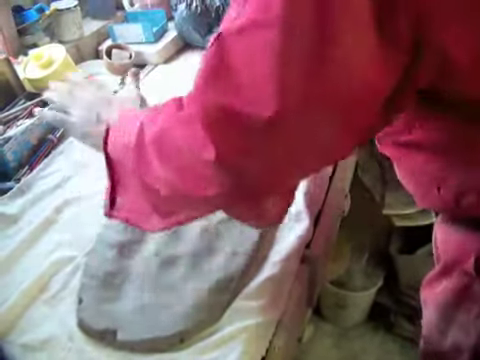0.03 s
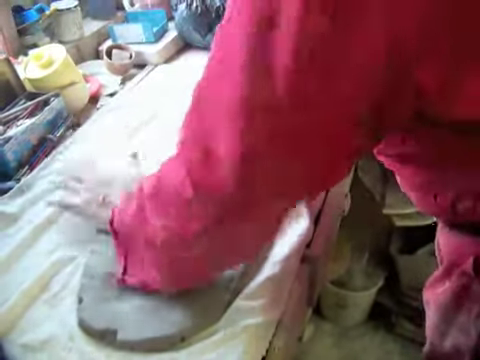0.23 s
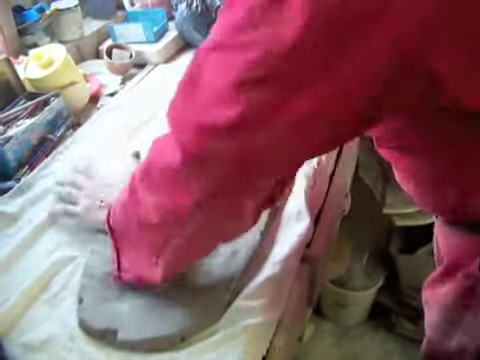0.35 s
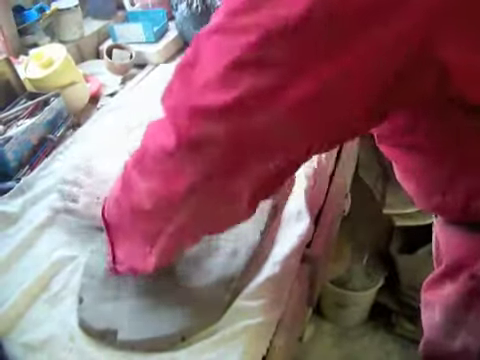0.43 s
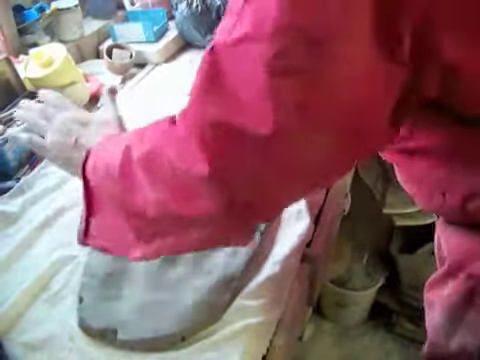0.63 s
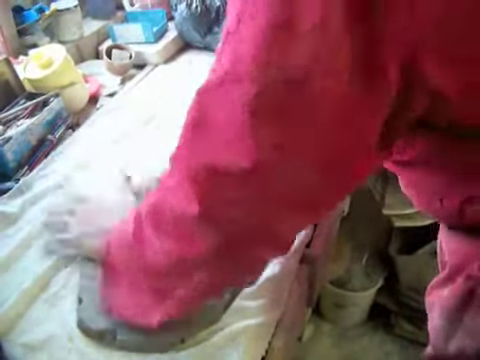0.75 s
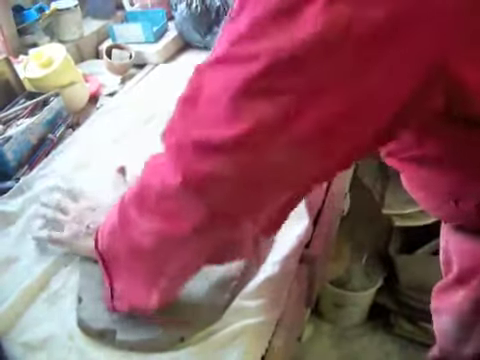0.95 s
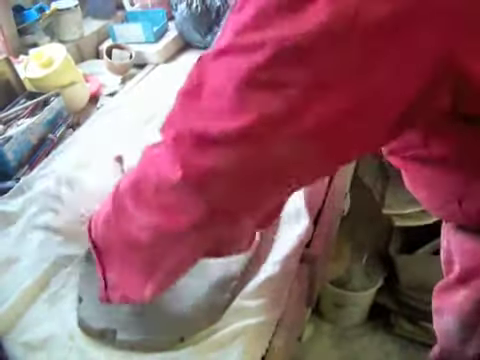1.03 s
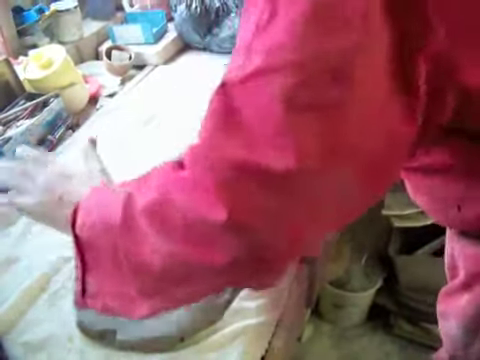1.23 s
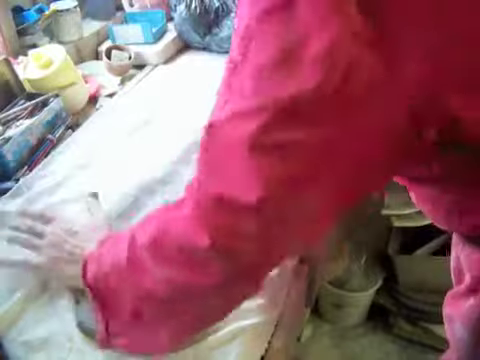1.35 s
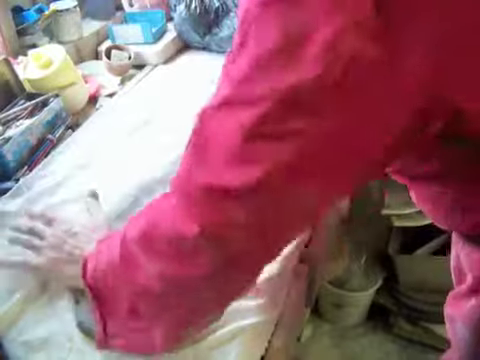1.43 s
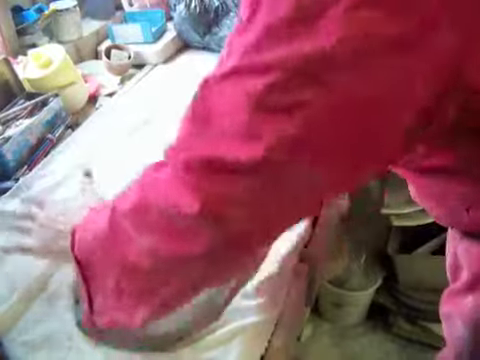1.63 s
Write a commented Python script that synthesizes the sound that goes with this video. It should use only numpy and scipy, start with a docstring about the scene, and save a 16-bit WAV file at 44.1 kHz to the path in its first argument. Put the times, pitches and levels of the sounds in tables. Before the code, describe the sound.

A hand slaps damp clay on a wooden bench at about 0.2, 0.8 and 1.35 seconds. Each close blow is a dull thud with a slight squelch; the second has the sharpest smack, the third a tiny air pop. Faint skin sliding and light pats come around 0.3 to 0.45 and 1.2 seconds. The small workshop adds a short reverberation and quiet room noise.

```python
"""Slapping damp clay

A hand slaps a slab of damp clay three times on a cloth-covered wooden bench in a small, quiet workshop. The
fingers land first with a crack; palm and heel follow with dull blows that excite the bench's modes, and the
clay squelches. Between slaps a sleeve swishes and the hand pats the slab lightly."""
import sys
import numpy as np
from scipy import signal
from scipy.fft import rfft, irfft
from scipy.io import wavfile

SR = 44100
rng = np.random.default_rng(int(sys.argv[2]) if len(sys.argv) > 2 else 0)


def bounce(signal):
    """Save signal as a 16-bit WAV file at the path given by the first command-line argument."""
    frames = np.transpose(np.atleast_2d(signal))
    limited = np.clip(frames, -1, 1)
    pcm = np.round(limited * 32767).astype(np.int16)
    wavfile.write(sys.argv[1], SR, pcm)


N = 74970


def amp(db):
    """Converts a level in decibels to an amplitude ratio."""
    return 10 ** (np.asarray(db) / 20)


def unit(x):
    """Normalises a signal to rms 1."""
    return x / np.sqrt(np.mean(x ** 2) + 1e-20)


def read(points, hz):
    """Interpolates a table on a logarithmic frequency axis."""
    f, value = np.transpose(points)
    return np.interp(np.log(hz + 1), np.log(f + 1), value)


def colour(x, spectrum):
    """Spectral shaping: weights each frequency of x, then normalises to rms 1."""
    gain = amp(read(spectrum, np.fft.rfftfreq(len(x), 1 / SR)))
    return unit(irfft(rfft(x) * gain, len(x)))


def add(mix, start, sound):
    """Superposition: adds a sound to the mix from a start time in seconds."""
    part = mix[max(round(start * SR), 0):][:len(sound)]
    part += sound[:len(part)]


def grains(per_s, spread_db):
    """Shot noise: tiny clicks of uneven size at random instants."""
    clicks = rng.standard_normal(N) * (rng.random(N) < per_s / SR)
    return clicks * amp(spread_db * np.minimum(rng.exponential(1, N), 3))


def background():
    """Ambient noise: steady room air and the slowly modulated rumble of the worked bench."""
    # spectrum of the room air (frequency [Hz], level [dB])
    air = [(20, -26), (35, 6.5), (52, 10.5), (80, -0.5), (125, -4), (190, -2), (260, -13.5), (330, -10),
           (500, -14.5), (1000, -18), (2000, -21), (3400, -21), (5000, -26.5), (7300, -33)]
    # spectrum of the bench's rumble (frequency [Hz], level [dB])
    rumble = [(20, -20.5), (55, 0), (115, 3.5), (210, -3), (300, -19.5), (550, -11), (1000, -27.5),
              (4000, -30.5)]
    # envelope of the rumble as the arm works (time [s], level [dB])
    rumble_level = [(0, -63.5), (.3, -55), (.43, -53.5), (.52, -60), (.75, -63), (.92, -54.5), (1.1, -55),
                    (1.27, -58), (1.5, -49.5), (1.7, -55)]
    swell = amp(np.interp(np.arange(N) / SR, *np.transpose(rumble_level)))
    steady = amp(-55.5) * colour(rng.standard_normal(N), air)
    return steady + swell * colour(rng.standard_normal(N), rumble)


def room_response():
    """Impulse response: early reflections from the cluttered bench, then a diffuse decaying tail."""
    # reverberation time of the workshop (frequency [Hz], t60 [s])
    reverberation = [(80, 0.34), (230, 0.49), (560, 0.27), (1470, 0.56), (3900, 1.01), (7500, .32)]
    # initial spectrum of the tail (frequency [Hz], level [dB])
    tone = [(60, -0.5), (250, -2.5), (600, -2.5), (1500, -2.5), (4000, -10.5), (7500, -4)]
    t = np.arange(SR) / SR
    reflections = rng.choice([-1., 1.], SR) * (rng.random(SR) < 4000 / SR)
    early = reflections * (t > 0.002) * np.exp(-t / 0.013)
    early = signal.sosfilt(signal.butter(1, 900, "high", fs=SR, output="sos"), early)
    hz, age, bands = signal.stft(rng.standard_normal(SR), SR, nperseg=256)
    bands = bands * amp(read(tone, hz)[:, None] - 60 * age / read(reverberation, hz)[:, None])
    tail = signal.istft(bands, SR, nperseg=256)[1][:SR] * np.minimum(t / 0.005, 1)
    return amp(-6) * early / np.linalg.norm(early) + amp(-11) * tail / np.linalg.norm(tail)


def room(tails=3, crossfades_per_s=14):
    """Smooth workshop reverberation: three crossfaded tails blend into an even, diffuse decay."""
    out, t = np.zeros(N), np.arange(N) / SR
    for k in range(tails):
        share = np.cos(np.pi * (crossfades_per_s * t + k / tails)) * np.sqrt(2 / tails)
        source = hand() + amp(-5) * pops()  # the pops sound drier, with less room ring
        out += signal.fftconvolve(source * share, room_response())[:N]
    return out


def sleeve(rise_s=0.002, bandwidth_hz=900):
    """Cloth friction: the sleeve swishes in strokes that start quickly and fade."""
    # sleeve swishes (time [s], length [s], level [dB], centre frequency [Hz])
    strokes = [(0.319, 0.15, -57, 1870), (0.374, 0.12, -65, 2800), (1.199, 0.11, -56, 2380)]
    # spectrum of the sleeve's rustle (frequency [Hz], level [dB])
    cloth = [(200, -26), (1000, -3), (1800, -6.5), (3600, -4), (5000, -8.5), (7500, -12)]
    out = np.zeros(N)
    for start, length, db, hz in strokes:
        age = np.maximum(np.arange(N) / SR - start, 0)
        envelope = (1 - np.exp(-age / rise_s)) * np.exp(-2 * age / length)
        slips = colour(grains(per_s=4700, spread_db=0.5), cloth)
        band = unit(signal.lfilter(*signal.iirpeak(hz, hz / bandwidth_hz, SR), slips))
        out += amp(db) * envelope * (band + amp(-4) * slips)
    return out


def pats(decay_s=0.0063):
    """Damped impact: the hand touches down lightly with a hollow puff of noise."""
    # light touches on the slab (time [s], level [dB])
    touches = [(.447, -47.5), (1.147, -56)]
    # spectrum of a pat (frequency [Hz], level [dB])
    puff = [(150, -22), (450, -1), (650, -7), (950, -4.5), (1400, -20.5), (4000, -27.5), (7500, -30)]
    out, t = np.zeros(N), np.arange(SR // 8) / SR
    for start, db in touches:
        add(out, start, amp(db) * np.exp(-t / decay_s) * colour(rng.standard_normal(len(t)), puff))
    return out


def pops(glide_per_s=-2.4):
    """Cavity resonance: trapped air escapes with a short ring that sinks as the pocket opens."""
    # air pockets under the hand (time [s], level [dB], starting frequency [Hz], t60 [s])
    pockets = [(.4472, -48, 680.6, 0.028), (1.2, -50, 2320, 0.037), (1.3555, -39, 3350, 0.024),
               (1.3562, -34.5, 2165, 0.018)]
    out, t = np.zeros(N), np.arange(SR // 8) / SR
    for start, db, hz, t60 in pockets:
        cycles = np.cumsum(hz * np.exp(glide_per_s * t)) / SR
        add(out, start, amp(db - 60 * t / t60) * np.sin(2 * np.pi * cycles))
    return out


def press():
    """Damped oscillation: the bench gives under the arm with a low push while the damp clay crackles."""
    # the arm's weight sinking into the slab (time [s], push level [dB], squelch level [dB])
    loads = [(0.2329, -26.5, -40), (0.796, -24.5, -41), (1.3448, -29.5, -41.5)]
    # spectrum of squelching clay (frequency [Hz], level [dB])
    squelch = [(100, -4), (500, 11.5), (1100, -1), (1600, 2), (2400, -5), (3400, -2), (5000, -5.5),
               (7500, -15.5)]
    push_hz, push_t60, push_rise_s = 67, 0.062, 0.0032
    squelch_rise_s, squelch_fall_s = 0.0066, 0.021
    out, t = np.zeros(N), np.arange(SR // 3) / SR
    push = -2 * (1 - np.exp(-t / push_rise_s)) * np.sin(2 * np.pi * push_hz * t)
    crackle = colour(grains(per_s=5500, spread_db=3), squelch)
    for start, push_db, squelch_db in loads:
        add(out, start, amp(push_db - 60 * t / push_t60) * push)
        age = np.arange(N) / SR - start
        rise = np.exp(-(np.minimum(age, 0) / squelch_rise_s) ** 2 / 2)
        fall = np.exp(-np.maximum(age, 0) / squelch_fall_s)
        out += amp(squelch_db) * rise * fall * crackle
    return out


def fingers(crack_s=0.00038, smack_db=-7.5):
    """Brief contact, broad spectrum: a sharp crack, then a smack as the rest of the skin lands."""
    # fingers and skin striking the clay (time [s], level [dB], decay time of the smack [s])
    strikes = [(0.2194, -31, 0.003), (.7832, -23.5, 0.0077), (0.8065, -39, 0.0012), (1.331, -44, 0.026)]
    # spectrum of the crack (frequency [Hz], level [dB])
    crack = [(100, -14), (500, -12), (1000, 5), (2200, -0.5), (3400, 8), (4500, 4), (5500, 6), (6500, 4.5),
             (7500, -5.5)]
    out, t = np.zeros(N), np.arange(SR // 8) / SR
    for start, db, smack_s in strikes:
        envelope = np.exp(-t / crack_s) + amp(smack_db) * np.exp(-t / smack_s)
        add(out, start, amp(db) * envelope * colour(rng.standard_normal(len(t)), crack))
    return out


def palm(thud_db=-18.5, bench_db=-26.5):
    """Modal excitation: each force pulse thuds and rings the bench; a longer pulse holds less treble."""
    # palm and heel landing (time [s], level [dB], corner frequency of the pulse [Hz])
    blows = [(0.2268, -6.5, 500), (0.2334, -0.5, 1220), (0.238, -7.5, 800), (0.243, -7, 846),
             (0.2506, -12.5, 886), (0.7914, -3.5, 454), (.7970, 2, 990), (0.8012, -7, 750),
             (.8130, -10, 1100), (1.3399, -15, 630), (1.3447, -7.5, 1160), (1.3566, -5, 1460),
             (1.3851, -8, 415)]
    # modes of the bench and slab (frequency [Hz], level [dB], t60 [s])
    modes = [(74.6, -14, .15), (131.8, -8, 0.19), (165, -18, 0.11), (195, -14, 0.088), (216.6, -16.5, 0.33),
             (269.7, -13, 0.27), (338.5, -6.5, 0.11), (467.5, -6.5, .11), (507, -11.5, 0.095),
             (589, -7.5, 0.069), (659, -4.5, 0.054), (760, -18, .06), (846, -12.5, 0.15),
             (1093, -11, 0.088), (1180, -12.5, .07), (1650, -22, 0.14)]
    out, t = np.zeros(N), np.arange(SR // 2) / SR
    ring = sum(amp(db - 60 * t / t60) * np.sin(2 * np.pi * hz * t) for hz, db, t60 in modes)
    for start, db, corner_hz in blows:
        u = 2 * np.pi * corner_hz * t
        force = (u / 4) ** 4 * np.exp(4 - u)  # smooth pulse, peak 1 at u = 4
        thud = signal.sosfilt(signal.butter(1, 103, "high", fs=SR, output="sos"), force)
        body = signal.fftconvolve(force / force.sum(), ring)[:len(t)]
        add(out, start, amp(db) * (amp(thud_db) * thud + amp(bench_db) * body))
    return out


def hand():
    """Superposition of the hand's contacts with the clay; each call draws a new fine grain."""
    return fingers() + palm() + press() + pats() + sleeve()


def scene(wall_delay_s=0.036, wall_db=-12):
    """Direct and reflected sound: the hand close by, a far wall's bass echo and the workshop around."""
    direct = hand() + pops()
    ambient = room() + background()
    bass = signal.sosfilt(signal.butter(2, 220, fs=SR, output="sos"), direct)
    add(ambient, wall_delay_s, amp(wall_db) * bass)
    return (direct + ambient)[None]


def record(dry):
    """Frequency response of a small microphone: two narrow dips, no deep bass and a steep band limit."""
    # dips in the sound at the microphone (frequency [Hz], bandwidth [Hz])
    notches = [(297, 21), (965, 44)]
    for hz, width in notches:
        dry = signal.lfilter(*signal.iirnotch(hz, hz / width, SR), dry)
    thin = signal.sosfilt(signal.butter(4, 40, "high", fs=SR, output="sos"), dry)
    lowpass = signal.firwin(121, 7280, window=("kaiser", 7), fs=SR)
    return signal.oaconvolve(thin, lowpass[None], "same")


dry = scene()
out = record(dry)
bounce(out)
```